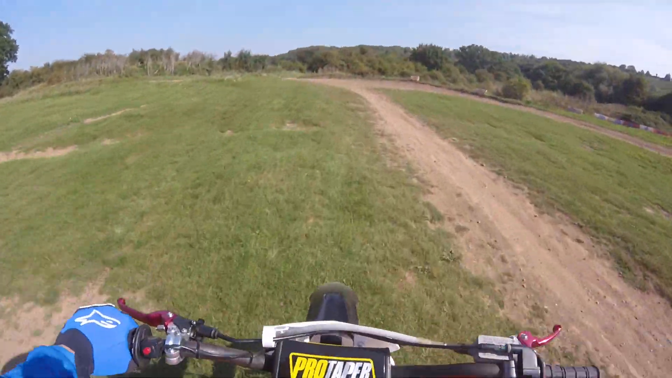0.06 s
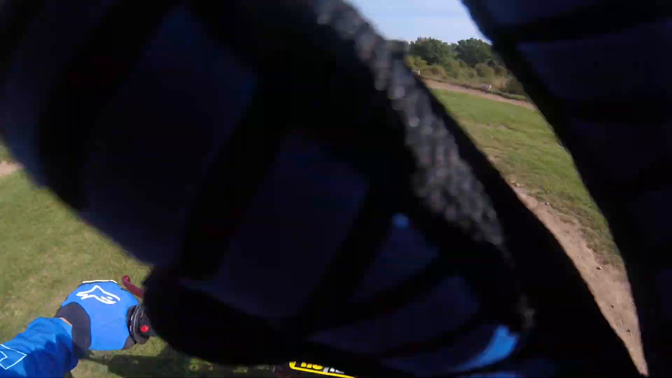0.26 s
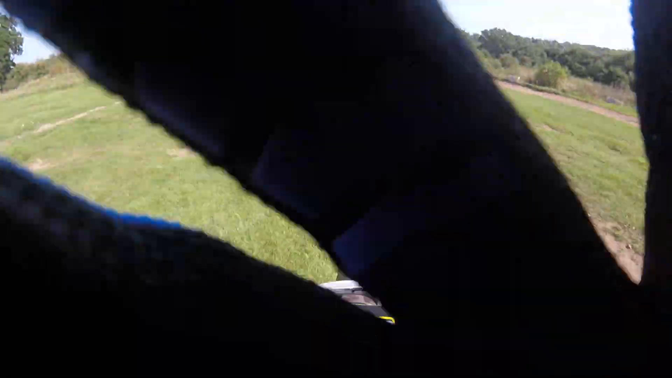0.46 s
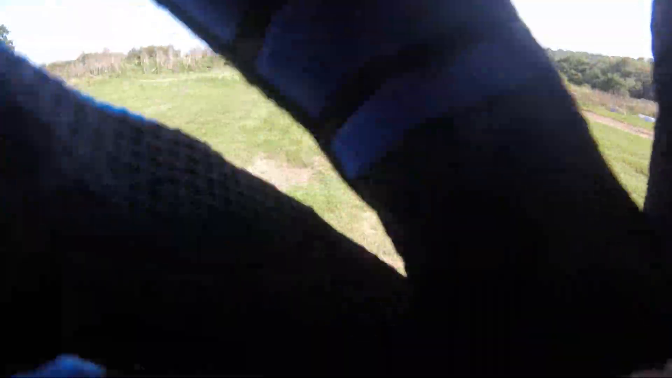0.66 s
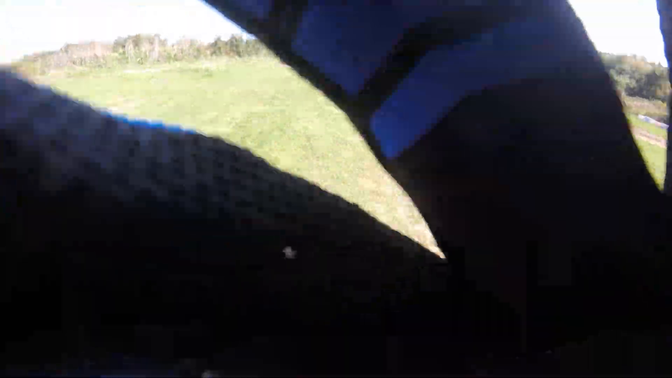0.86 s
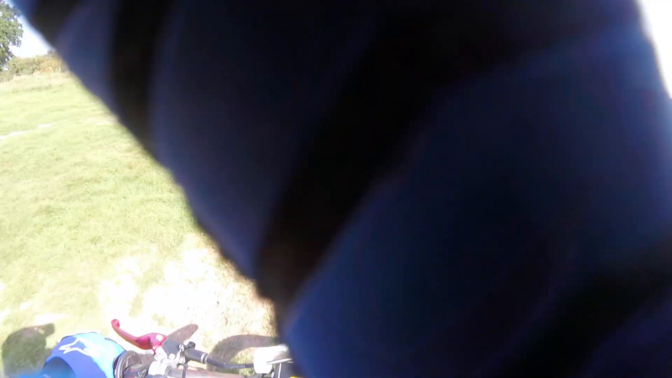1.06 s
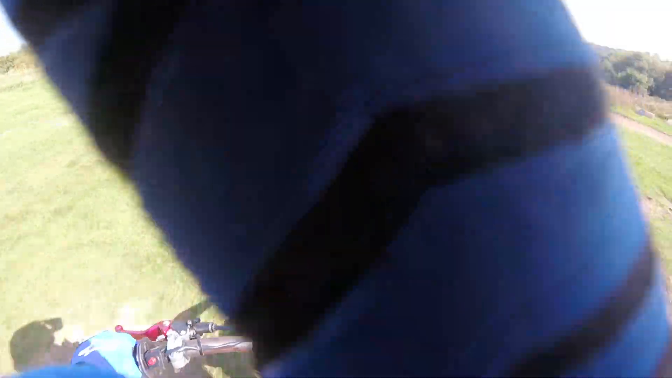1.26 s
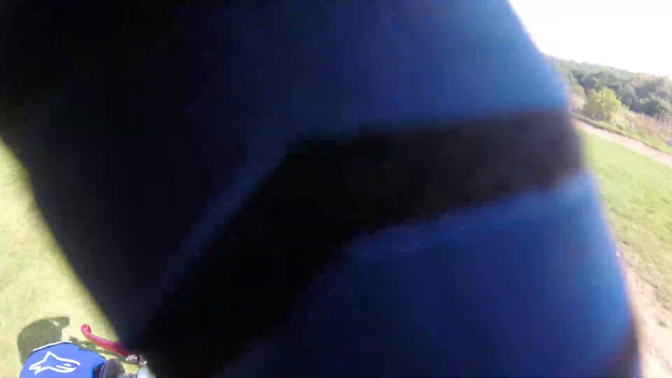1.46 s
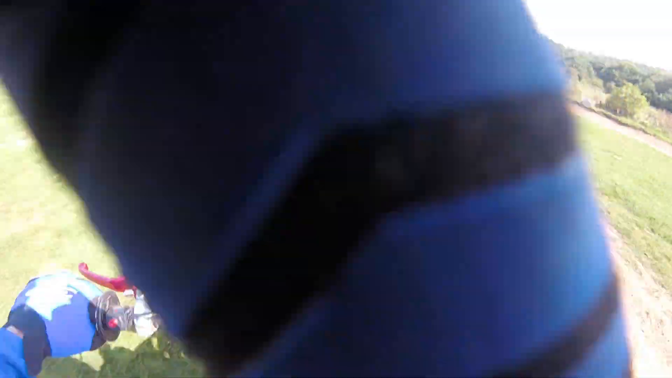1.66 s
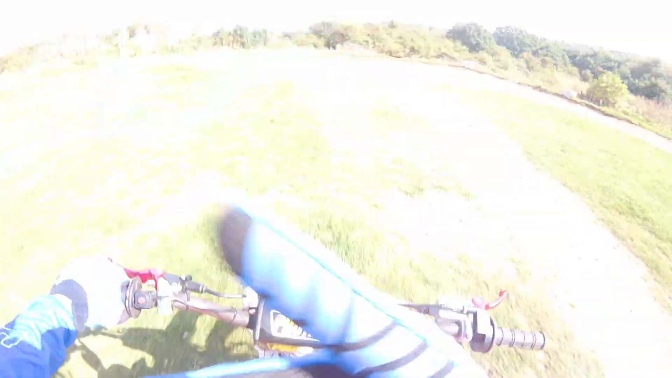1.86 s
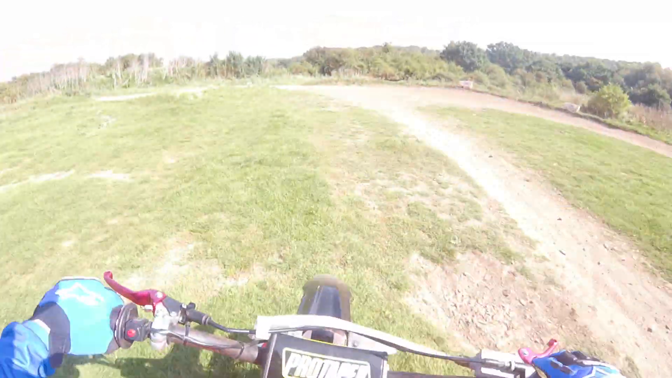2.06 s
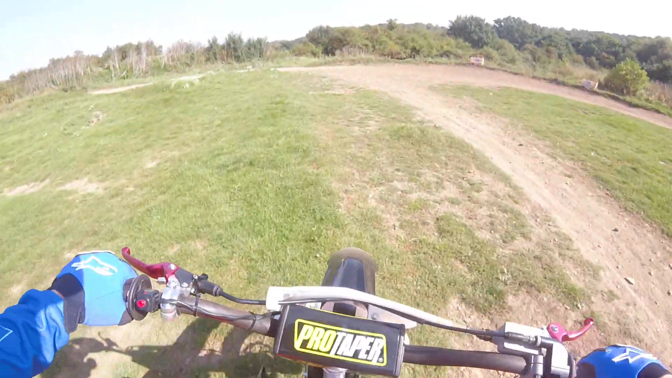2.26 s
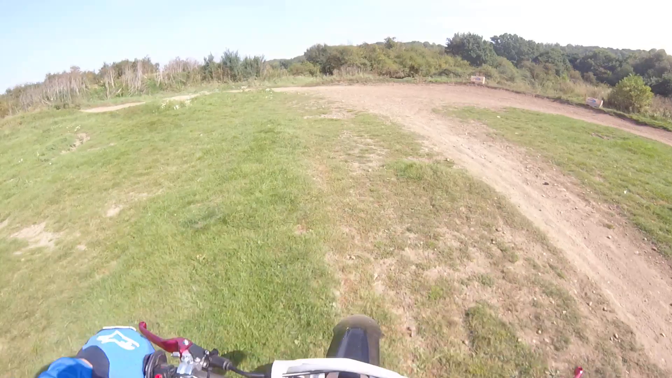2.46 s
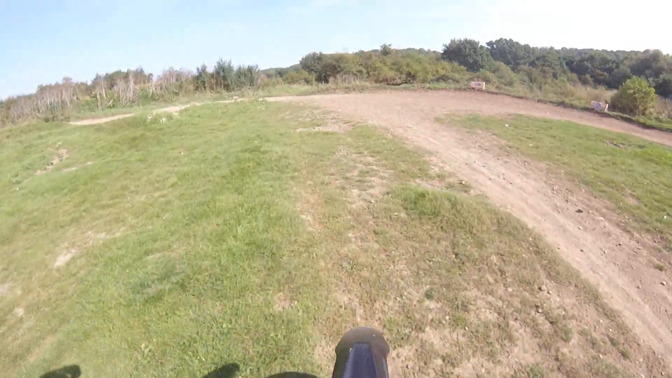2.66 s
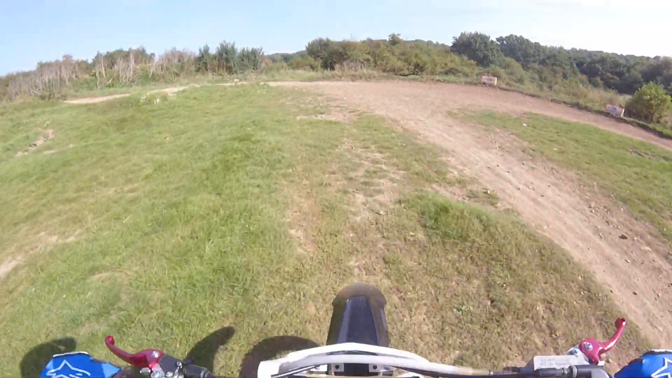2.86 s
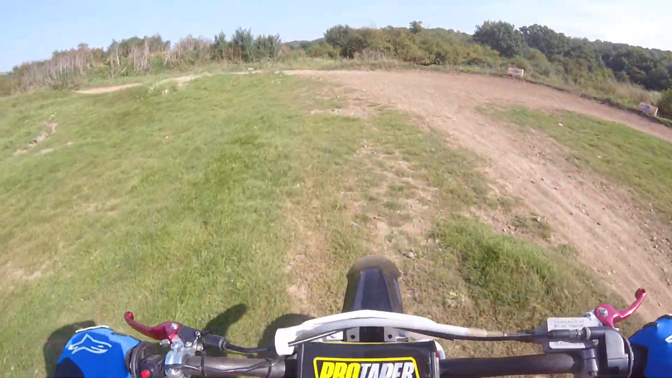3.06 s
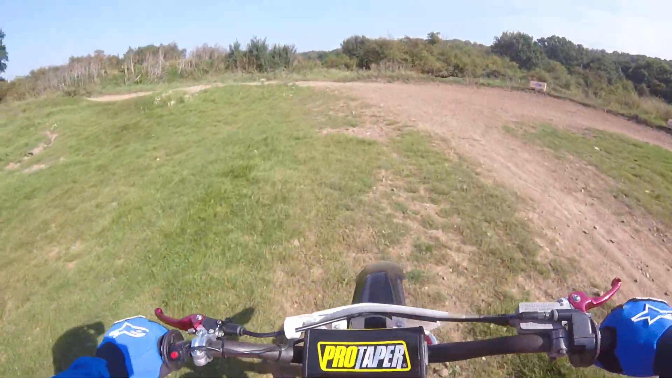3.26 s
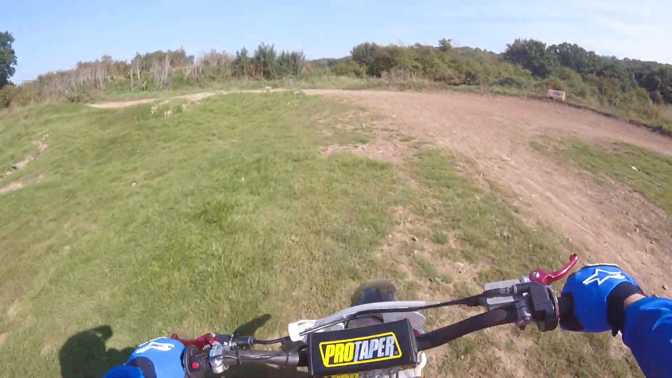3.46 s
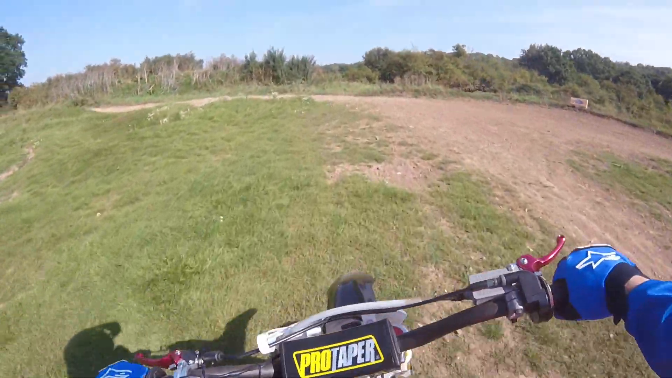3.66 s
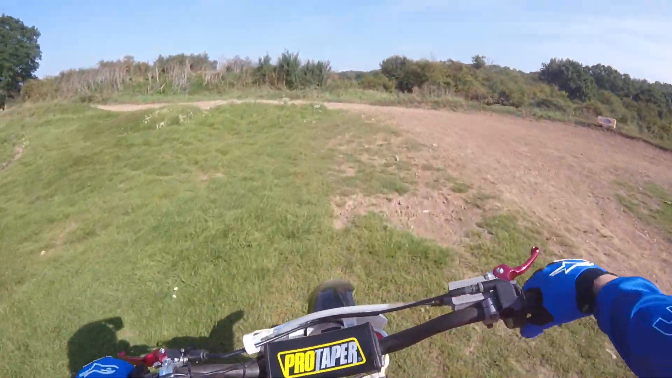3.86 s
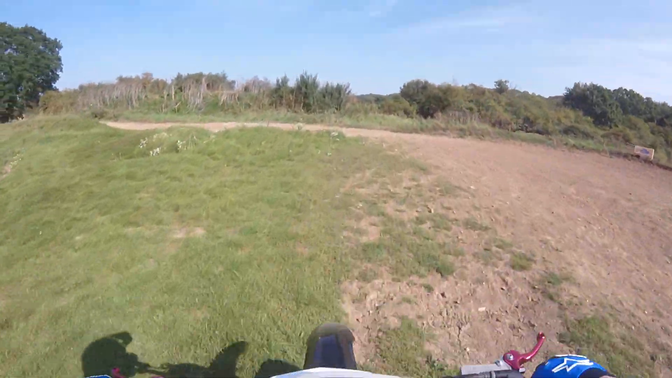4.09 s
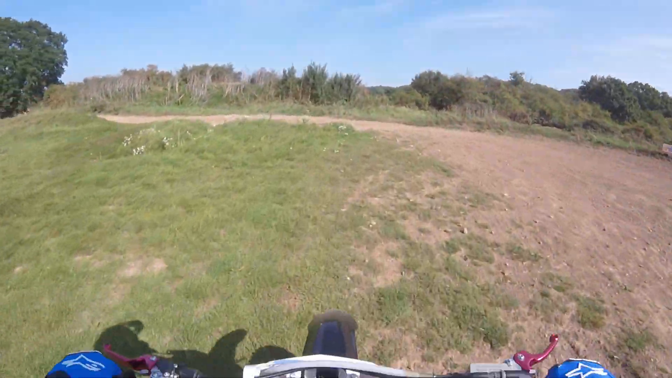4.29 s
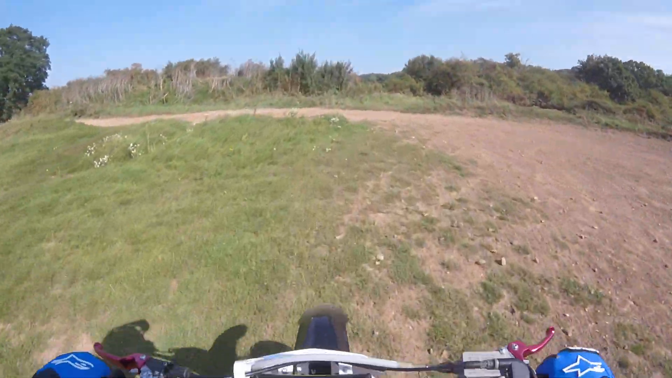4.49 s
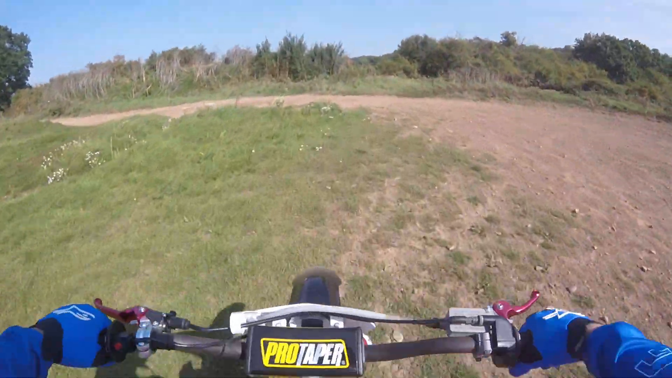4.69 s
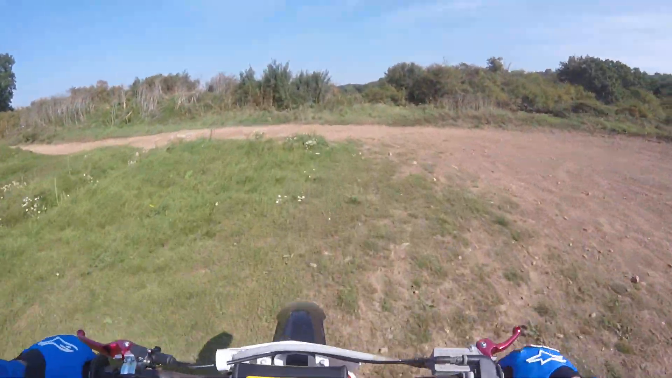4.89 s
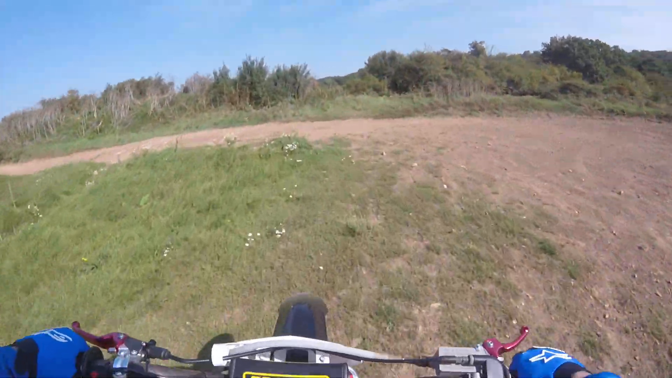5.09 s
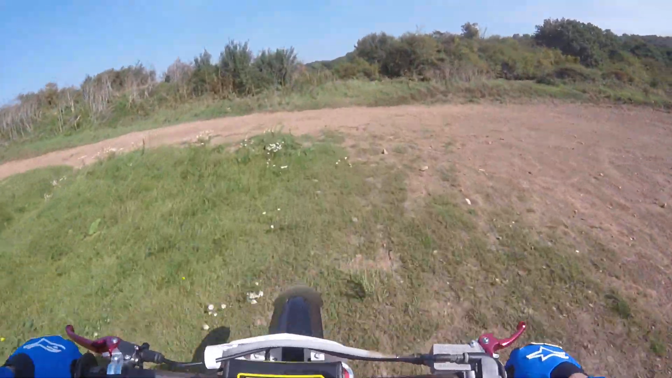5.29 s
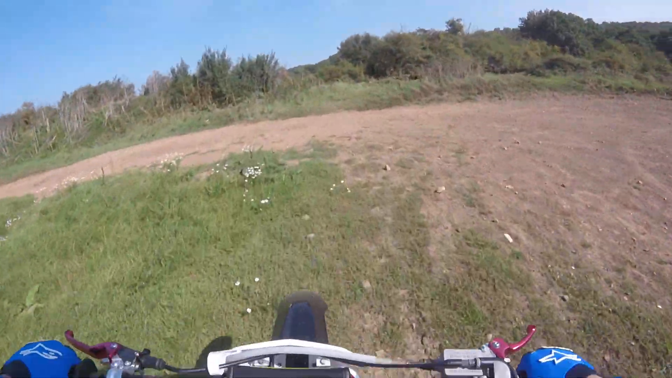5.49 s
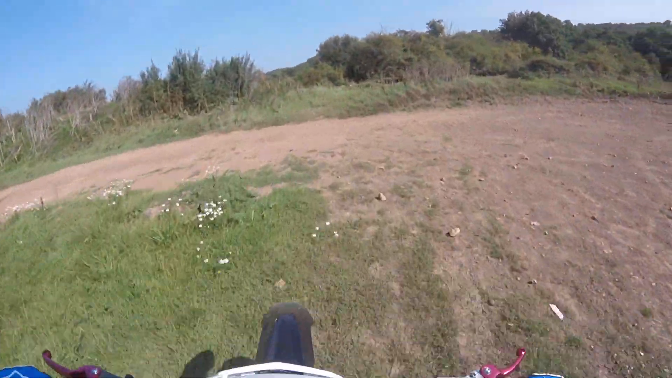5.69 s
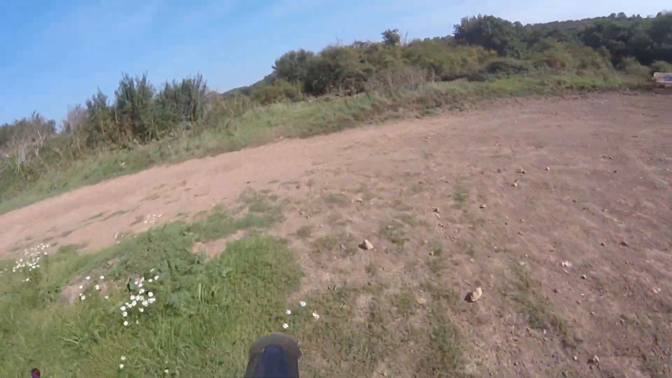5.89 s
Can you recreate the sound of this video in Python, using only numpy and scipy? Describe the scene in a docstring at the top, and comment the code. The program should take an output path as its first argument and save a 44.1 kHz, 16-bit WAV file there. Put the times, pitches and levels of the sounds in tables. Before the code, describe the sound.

Single-cylinder puttering heard from a helmet camera: glove bumps and creaks smother it early, then throttle surges, rattles and low wind thumps follow.

```python
"""First a small single-cylinder four-stroke dirt bike slows down, heard by a helmet camera in its housing.
Each firing rings the exhaust as a set of dying tones; valve gear and chain clatter as noise in resonances.
Early on a gloved hand muffles the engine, bumps, rubs and creaks on the plastic: strokes of hiss and steps.
Later the engine pulls, eases off and surges again, while jolts and wind thump the housing as slow pressure."""
import sys
import numpy as np
from scipy import signal
from scipy.io import wavfile
from scipy.ndimage import uniform_filter1d, minimum_filter1d

SR = 44100
rng = np.random.default_rng(int(sys.argv[2]) if len(sys.argv) > 2 else 0)


def log_audio(samples):
    """Write samples as a 16-bit WAV file to the path given in sys.argv[1]."""
    # one column per channel
    frames = np.atleast_2d(samples).T
    # limit to full scale, then quantise
    limited = np.clip(frames, -1, 1)
    pcm = np.round(limited * 32767).astype(np.int16)
    wavfile.write(sys.argv[1], SR, pcm)


N = 261954

# engine speed: [t/s, firing rate f/Hz]
FIRING_RATE = [(0.0, 37.84), (0.2, 32.39), (0.45, 32.39), (1.2, 22.91), (1.85, 21.06), (2.264, 23.64),
               (2.397, 23.32), (2.439, 18.41), (2.622, 21.17), (2.817, 22.85), (2.997, 20.62),
               (3.165, 26.09), (3.357, 27.09), (3.397, 24.1), (3.723, 29.66), (3.805, 32.33),
               (3.916, 28.39), (4.087, 29.61), (4.098, 27.7), (4.343, 26.12), (4.5, 27.15), (4.75, 34.67),
               (4.82, 27.39), (5.27, 26.48), (5.94, 23.63)]
# engine load: [t/s, firing level/dB, clatter level/dB, roughness 0-1]; off throttle the gas burns unevenly
ENGINE_LOAD = [(0, -20.5, -41, 0.65), (.45, -31.5, -49, 0.81), (1.8, -37.5, -60, 0.57),
               (1.9, -34, -60.5, 0.27), (2.249, -26.5, -55.5, 0.28), (2.7, -21.5, -50.5, 0.14),
               (3.0, -23.5, -49, 0.58), (3.24, -18.5, -45, 0), (3.82, -13.5, -41, 0.16),
               (4.078, -13, -43, 0.02), (4.238, -32, -48, 0.37), (4.51, -30, -47.5, 0.77),
               (4.54, -17.5, -48, 0), (4.62, -11.5, -39, 0.3), (4.68, -10, -36.5, 0.29),
               (4.745, -14, -40, 0.07), (4.8, -17, -45, 0.26), (4.879, -18.5, -46, 0.28),
               (5.001, -32, -48, 0.78), (5.94, -32.5, -49.5, 0.69)]
# the engine stumbles (minus) or catches (plus): [t/s, length/s, change of firing level/dB]
STUMBLES = [(2.29, 0.093, -9.5), (2.75, 0.061, -7), (4.334, 0.043, 7), (4.397, 0.037, 21),
            (5.135, 0.068, 12.5), (5.498, 0.091, 13.5), (5.746, 0.04, 11), (5.789, 0.12, 12.5)]
# exhaust pipe tones before warming: [f/Hz, width/Hz, level/dB, power of gas heat that lifts f]
PIPE_MODES = [(234.2, 30.8, 0.5, 0.61), (291.7, 89, 1, 0.1), (387, 87, -8.5, 0.05), (673, 55, -34.5, 1),
              (153.4, 93, -3, 1)]
# clatter resonances in the housing: [f/Hz, width/Hz, relative level/dB]
HOUSING_MODES = [(596.4, 150, -1), (911, 190, -5), (1230, 90, 3), (1518, 150, -2), (2000, 850, -8),
                 (2620, 89, -2.5), (3114, 190, 0), (4850, 720, -7.5), (6260, 250, -19)]
# valve gear parts that ping once a cycle: [f/Hz, place in the cycle 0-1, relative level/dB]
VALVE_PINGS = [(3590, 0.87, -8.5), (7320, 0.45, -21.5), (7740, 0.5, -22.5), (9170, .41, -25)]
# brief metal squeaks, loudest 4.1 ms after t: [t/s, f/Hz, level/dB]
SQUEAKS = [(2.876, 4580, -50), (2.982, 4560, -48), (2.989, 5270, -48.5)]
# jolts through the helmet: [t/s, push (inward positive), f/Hz, length/s]
JOLTS = [(0.229, 0.73, 66, 0.0063), (0.258, 0.24, 30, 0.043), (.392, 0.13, 67, 0.024),
         (0.435, -0.51, 57, 0.003), (.458, -0.58, 57, 0.0026), (1.176, -0.8, 22, 0.0016),
         (1.704, 0.22, 15.2, 0.17), (2.602, 0.29, 38, 0.057), (2.988, -0.77, 22, 0.0037),
         (3.022, 0.58, 29, 0.023), (3.464, 0.3, 32, 0.034), (4.352, 0.5, 13, 0.0092),
         (4.952, 0.34, 28, 0.01), (5.422, 0.66, 28.4, 0.0098)]
# the hand changes how loud the bike is: [t/s, level/dB]
HAND_MUFFLE = [(.205, -1), (.295, -19), (.35, -0.5), (.43, -3.5), (.487, -16.5), (.8, -12.5), (1.09, -5.5),
               (1.14, 3.5), (1.17, 1.5), (1.2, -12), (1.43, -1), (1.85, -3), (1.9, -0.5)]
# the hand seals the housing: [start t/s, end t/s]
GLOVE_SEAL = 0.36, 1.7
# sudden steps; the glove sticks and slips until 1.84 s, a knock at 3.003 s: [t/s, relative step level/dB]
SUDDEN_STEPS = [(0.489, -45.5), (0.502, -49), (0.53, -49), (0.5472, -41), (0.591, -39), (0.617, -39),
                (0.633, -37), (0.706, -36.5), (0.7235, -20.5), (.733, -39.5), (0.841, -29.5), (0.845, -30),
                (.895, -41), (0.9115, -25), (0.918, -34), (0.9302, -17.5), (.941, -29), (0.945, -29.5),
                (0.987, -34.5), (1.0347, -32.5), (1.0835, -32), (1.09, -36), (1.2827, -39), (1.289, -40.5),
                (1.6173, -37.5), (1.627, -32.5), (1.673, -30), (1.685, -35.5), (1.718, -35), (1.757, -38.5),
                (1.8304, -35.5), (1.839, -31), (3.003, -33)]
# glove fabric dragged on the housing: [t/s, length/s, level/dB, extra treble level/dB]
RUB_STROKES = [(0.223, 0.011, -36.5, 4), (0.242, 0.0014, -39, -14), (0.248, 0.068, -48, 6),
               (0.351, 0.015, -39.5, 11), (0.388, 0.076, -52, 5), (0.434, 0.0015, -35, 6),
               (0.457, 0.0041, -50, 18), (0.723, 0.0061, -64, 20), (1.02, 0.004, -48, 5.5),
               (1.056, 0.031, -54, 2.5), (1.103, 0.051, -52, -1), (1.169, 0.0077, -46.5, 8.5),
               (1.421, 0.045, -52, -28), (1.455, 0.07, -57, -14), (1.602, 0.0083, -52, 2),
               (1.706, 0.0045, -46, 3.5)]
# colour of the fabric hiss: [f/Hz, width/Hz, level/dB]
RUB_BANDS = [(1300, 1250, -5.5), (2800, 1040, -6.5), (4600, 4400, -16.5), (8200, 12000, -34),
             (11400, 1300, -34)]
# shaking of the helmet: [t/s, buffet level/dB, frame boom level/dB]
HELMET_SHAKE = [(0.0, -25, -29.5), (.2, -22, -33.5), (.27, -39, -32.5), (.4, -17, -56), (0.69, -14, -51.5),
                (1.801, -22, -54), (2.3, -27.5, -37), (2.628, -12.5, -38), (2.839, -36.5, -37),
                (2.941, -17.5, -40), (4.4, -15, -34.5), (4.85, -20.5, -36.5), (5.34, -16, -38),
                (5.94, -20.5, -40)]

FIRST_PHASE = .8  # place in the engine cycle at the start, 0-1
CATCH_FADE = 0.3  # share of a stumble or catch that is gone by its end
CATCH_CLEAN_DB = 18.5  # a catch this strong burns cleanly
RISE_S = 0.0068  # a note begins this long before its firing instant
GAS_SMOOTH_DB, GAS_ROUGH_DB = -29.5, -10  # rushing gas against the firing level, at roughness 0 and 1
COAST_TILT_DB = 20  # dB per octave, within 0.2 octave: rough running favours the higher pipe tones
BARK_HZ, BARK_DB, BARK_S = 830, -34.5, .006  # a hiss of gas leaves with each firing
# the silencer's far end answers each firing with a higher puff
ECHO_S, ECHO_HZ, ECHO_WIDTH_HZ, ECHO_DB = 0.00583, 528, 68, -15.5
BOOM_HZ, BOOM_WIDTH_HZ = 108.8, 9.2  # low frame tone before warming
PING_LOAD = 0.23  # extra dB per dB of clatter: the parts ring harder under load
HAND_TREBLE_SHARE = 1.23  # the hand takes more dB from the clatter than from the firing
CRACKLES, CRACKLE_DB = 45, -49  # number of faint crackles, and the lowest of their relative step levels
TOP_HZ = 15700  # highest pitch the camera lets through


def undb(db):
    """Turn decibels into a plain loudness factor."""
    return 10 ** (np.asarray(db) / 20)


def unit(x):
    """Scale a sound to an average (RMS) strength of 1."""
    return x / np.sqrt(np.mean(x ** 2))


def noise():
    """Plain hiss as long as the scene."""
    return rng.standard_normal(N)


def ring(x, hz, width):
    """Two-pole resonance, gain 1 at the centre."""
    return signal.lfilter(*signal.iirpeak(hz, hz / width, SR), x)


def cut(x, hz, kind, order):
    """Keep only what is below ("low") or above ("high") a pitch."""
    return signal.sosfilt(signal.butter(order, hz, kind, fs=SR, output="sos"), x)


def walk(rate):
    """Random levels held 1 / rate s, then smoothed twice into a slow wander."""
    k = int(SR / rate)
    held = np.repeat(rng.standard_normal(N // k + 1), k)
    return uniform_filter1d(uniform_filter1d(held, k), k)[:N]


def drifting(hz, width, drift):
    """Noise in a resonance whose centre wanders by drift widths."""
    pair = noise() + 1j * noise()
    slow = signal.lfilter([1], [1, -np.exp(-np.pi * width / SR)], pair)
    turning = np.cumsum(hz + drift * width * walk(15)) / SR
    return unit(np.real(slow * np.exp(2j * np.pi * turning)))


def dying_tone(tau, hz, width, lift=1):
    """A struck resonance: a tone at lift times hz that dies faster the wider it is."""
    return np.exp(-np.pi * width * tau) * np.sin(2 * np.pi * hz * lift * tau)


def stumbles(t):
    """Change of the firing strength in dB: sudden at first, partly fading, then over."""
    db = np.zeros(N)
    for s, length, change_db in STUMBLES:
        active = (t > s) * (t < s + length)
        db += change_db * active * (1 - CATCH_FADE * (t - s) / length)
    return uniform_filter1d(db, size=SR // 100)


def exhaust(t, cycles, firing_db, boom_db, rough):
    """One soft gas pulse a cycle rings the pipe and a low frame tone; hotter gas under load raises the pipe."""
    # the pipe heats at once but stays warm for half a second after the hardest firing
    recent_db = -minimum_filter1d(-firing_db, size=SR // 2, origin=SR // 4 - 1)
    warmth = 1 + 0.082 * np.tanh((uniform_filter1d(recent_db, SR // 10) + 19.5) / 2.07)
    gas_db = GAS_SMOOTH_DB + rough * (GAS_ROUGH_DB - GAS_SMOOTH_DB)
    gas = unit(ring(ring(noise(), 240, 110), 273, 430))
    out = undb(firing_db + gas_db) * gas

    tau = t[:int(.1 * SR)]  # time within one note
    hiss = ring(rng.standard_normal(N + len(tau)), BARK_HZ, BARK_HZ / 2)
    hiss = unit(cut(hiss, 2 * BARK_HZ, "low", order=4))
    bark = undb(BARK_DB) * np.exp(-((tau - ECHO_S - BARK_S) / BARK_S) ** 2)
    back = np.maximum(tau - ECHO_S, 0)  # time since the echo began
    echo_swell = undb(ECHO_DB) * (1 - np.exp(-back / 0.0044))
    opening = (1 - np.exp(-(tau / 0.0027) ** 2)) * (1 - (tau / tau[-1]) ** 2)

    firings = np.flatnonzero(np.diff(np.floor(cycles)))
    chance = rng.standard_normal((len(firings), 4))
    for i, (late, size, tune, shake) in zip(firings, chance):
        heat = warmth[i] + 0.03 * rough[i] * tune
        pipe = bark * hiss[i:i + len(tau)]
        for k, (hz, width, db, lift) in enumerate(PIPE_MODES):
            tilt_db = COAST_TILT_DB * rough[i] * np.clip(np.log2(hz / 270), -.2, .2)
            way = (-1) ** k  # neighbours start in opposite directions
            pipe += way * undb(db + tilt_db) * dying_tone(tau, hz, width, heat ** lift)
        pipe += echo_swell * dying_tone(back, ECHO_HZ, ECHO_WIDTH_HZ, heat ** .5)
        frame = dying_tone(tau, BOOM_HZ, BOOM_WIDTH_HZ, heat ** 0.58)
        pipe_gain = undb(firing_db[i] + 3.5 + 5 * rough[i] * size)
        frame_gain = undb(boom_db[i] + 10 + 1.2 * shake)
        note = opening * (pipe_gain * pipe - frame_gain * frame)
        start = max(i + int((0.0014 * rough[i] * late - RISE_S) * SR), 0)
        out[start:start + len(tau)] += note[:N - start]
    return out


def clatter(cycles, db, firing_db):
    """Rattling noise in the housing: lows puff with the firing, highs tick with the valves, brighter under load."""
    out = np.zeros(N)
    together = walk(25.36) + 1.73 * walk(150)
    for hz, width, mode_db in HOUSING_MODES:
        high = np.clip(np.log2(hz / 2500), -1, 2)  # octaves above 2500 Hz
        place = .15 if hz < 2300 else .35
        # two crank turns a cycle
        crank_db = (1.3 + .8 * walk(8)) * np.cos(4 * np.pi * (cycles - place - .1))
        beat_db = (1.1 + 0.7 * abs(high) ** 1.8) * np.cos(np.pi * (cycles - place)) ** 4
        beat_db = beat_db * (1.5 + 0.3 * walk(14))
        flicker_db = together + (2.2 + 0.13 * high) * walk(30)
        load_db = 0.014 * high * (firing_db + 12.5)
        level = undb(mode_db + crank_db + beat_db + flicker_db + load_db)
        out += level * drifting(hz, width, drift=0.37)
    # the housing wall shuts out the top; nothing rattles down among the pipe tones
    out = cut(cut(out, 9600, "low", order=5), 440, "high", order=2)
    return undb(db - 1.5) * unit(out)


def ping(t, s, hz, db, length_s):
    """A small metal part rings: a tone that swells and fades around time s."""
    return undb(db) * np.exp(-((t - s) / length_s) ** 2) * np.sin(2 * np.pi * hz * t)


def pings(t, cycles, db):
    """Valve parts ring briefly once a cycle, some cycles much louder than others; a few lone squeaks."""
    out = np.zeros(N)
    for s, hz, squeak_db in SQUEAKS:
        out += ping(t, s + 0.0041, hz, squeak_db, length_s=0.0045)
    for hz, place, part_db in VALVE_PINGS:
        strikes = np.flatnonzero(np.diff(np.floor(cycles - place)))
        for i, (size, tune) in zip(strikes, rng.standard_normal((len(strikes), 2))):
            near = slice(max(i - 500, 0), i + 500)
            level_db = db[i] + PING_LOAD * (db[i] + 45) + part_db + 2.5 * size
            out[near] += ping(t[near], t[i], hz * (1 + .02 * tune), level_db, length_s=.0035)
    return out


def jolts(t):
    """Each jolt pushes or swings the air pressure in the housing, rising and dying in a bell shape."""
    out = np.zeros(N)
    for s, push, hz, length in JOLTS:
        out += push * np.exp(-((t - s) / length) ** 2) * np.cos(2 * np.pi * hz * (t - s))
    return out


def sudden_steps(pressure):
    """Glove slips, and later a knock, each step the pressure against its push; the step then leaks away.
    Large ones are brief staircases; weaker steps trail each one."""
    faint_time, faint_level = rng.random((CRACKLES, 2)).T  # the cloth also crackles faintly at random
    listed_s, listed_db = np.transpose(SUDDEN_STEPS)
    s = np.r_[listed_s, GLOVE_SEAL[0] + 1.4 * faint_time]
    db = np.r_[listed_db, CRACKLE_DB + 10 * faint_level]
    way = -np.sign(pressure[(s * SR).astype(int)])
    chance = rng.random((len(s), 10)).T
    large = np.clip((db + 33.0) / 8, 0, 1)
    # parts of each staircase: (wait in s, level change in dB)
    parts = [(0 * s, -2.5 * large), (0.0013 * large * chance[0], -2), (0.0022 * large * chance[1], -2)]
    for gap, weak in chance[2:].reshape(-1, 2, len(s)):
        parts.append((0.0027 + .022 * gap, -9 * large - 9 * weak))
    kicks = np.zeros((2, N))  # rows: large steps, small steps
    for wait, change_db in parts:
        at = ((s + wait) * SR).astype(int)
        for row, share in enumerate((large, 1 - large)):
            kicks[row, at] += share * way * undb(db - 3.5 + change_db)
    leaking = signal.lfilter([1], [1, -np.exp(-1 / (.07 * SR))], kicks)  # leaks away over 0.07 s
    return cut(leaking[0], 5700, "low", order=2) + cut(leaking[1], 5600, "low", order=2)


def rubs(t):
    """Dragged fabric hisses in short strokes, grainy, each with its own brightness."""
    grain = undb(5.7 * walk(250) + 0.96 * walk(58.8))
    bands = []
    for hz, width, db in RUB_BANDS:
        bands.append(undb(db) * unit(ring(ring(noise(), hz, width), hz, 1.03 * width)))
    dull, bright = sum(bands[:2]), sum(bands[2:])
    out = np.zeros(N)
    for s, length, db, treble_db in RUB_STROKES:
        i = slice(int((s - .01) * SR), int((s + length + .01) * SR))
        edge = 0.0015 + 0.22 * length  # time to fade in or out, s
        inside = np.minimum(t[i] - s, s + length - t[i])
        stroke = np.clip(inside / edge + .5, 0, 1)
        out[i] += undb(db) * stroke * (dull[i] + undb(treble_db) * bright[i])
    return grain * out


def buffet(t, db):
    """Wind and head shake push slowly on the microphone; the hand weakens them and adds slower squeezes."""
    covered = 1. * (t > GLOVE_SEAL[0]) * (t < GLOVE_SEAL[1])
    sealed = uniform_filter1d(covered, int(0.062 * SR))
    wind = unit(cut(cut(noise(), 45.4, "low", order=4), 12.5, "high", order=2))
    squeeze = unit(cut(cut(noise(), 24, "low", order=4), 8, "high", order=2))
    mix = (1 - 0.806 * sealed) * wind + (0.36 + 0.46 * sealed) * squeeze
    return undb(db - 4.5 + 2.0 * walk(6.0)) * mix


def boom(db, rough):
    """Road shake keeps the frame humming between firings, less while the engine pulls."""
    hum = ring(ring(noise(), BOOM_HZ, 31), BOOM_HZ, 43)
    return undb(db - 14 + 6 * rough + 3.3 * walk(15)) * unit(hum)


def scene():
    """Add the bike, the pressure thumps, the sudden steps and the rubs into one channel."""
    t = np.arange(N) / SR
    cycles = FIRST_PHASE + np.cumsum(np.interp(t, *np.transpose(FIRING_RATE))) / SR
    load_s, *load_columns = np.transpose(ENGINE_LOAD)
    firing_db, clatter_db, rough = (np.interp(t, load_s, column) for column in load_columns)
    shake_s, *shake_columns = np.transpose(HELMET_SHAKE)
    buffet_db, boom_db = (np.interp(t, shake_s, column) for column in shake_columns)
    muffle_db = np.interp(t, *np.transpose(HAND_MUFFLE))
    catch_db = stumbles(t)

    rough = rough * (1 - catch_db / CATCH_CLEAN_DB)
    firing_db = firing_db + catch_db + muffle_db
    clatter_db = clatter_db + HAND_TREBLE_SHARE * muffle_db

    bike = exhaust(t, cycles, firing_db, boom_db, np.clip(rough, 0, 1))
    bike += clatter(cycles, clatter_db, firing_db)
    bike += pings(t, cycles, clatter_db)
    bike += boom(boom_db, rough)
    pressure = jolts(t) + buffet(t, buffet_db)
    touches = sudden_steps(pressure) + rubs(t)
    return (bike + pressure + touches)[None]


def record(dry):
    """The camera rounds the loudest peaks and cuts the top."""
    rounded = 0.85 * np.tanh(dry / 0.72)
    return signal.sosfilt(signal.ellip(8, .2, 70, TOP_HZ, fs=SR, output="sos"), rounded)


dry = scene()
out = record(dry)
log_audio(out)
```